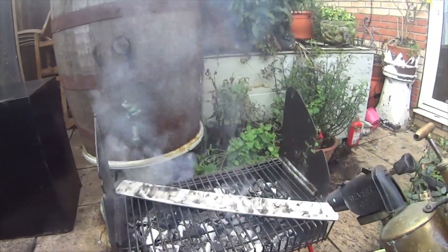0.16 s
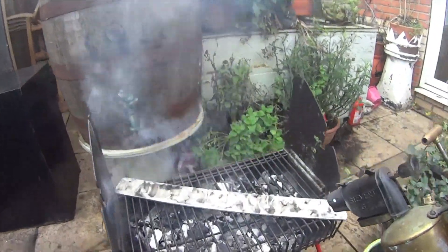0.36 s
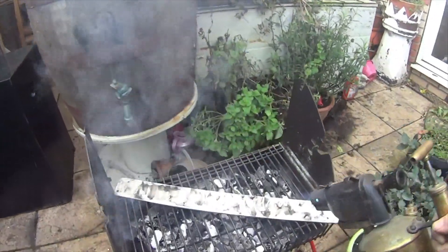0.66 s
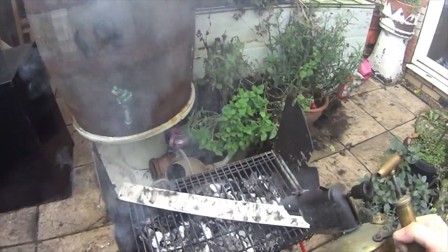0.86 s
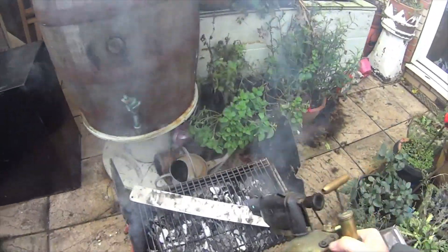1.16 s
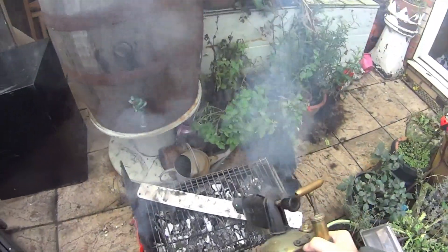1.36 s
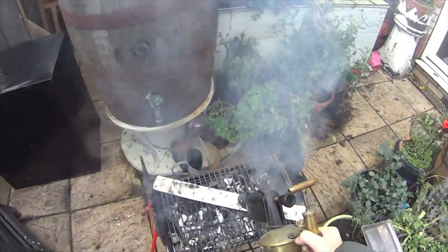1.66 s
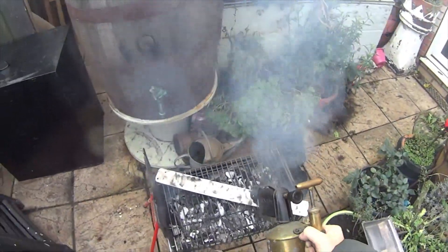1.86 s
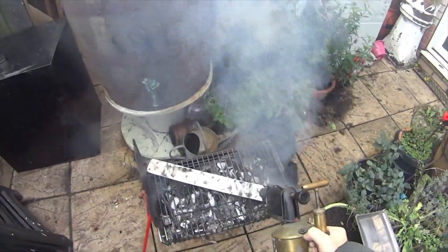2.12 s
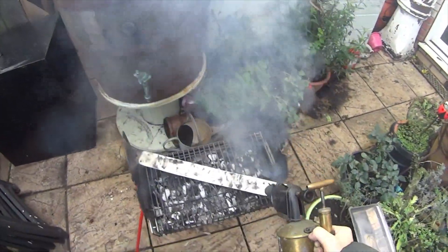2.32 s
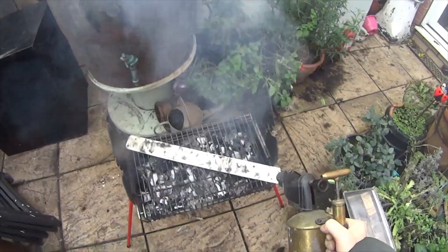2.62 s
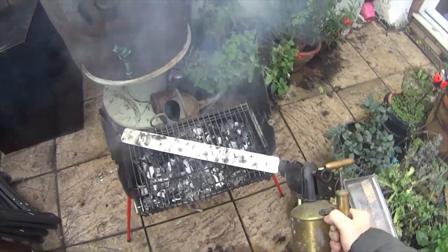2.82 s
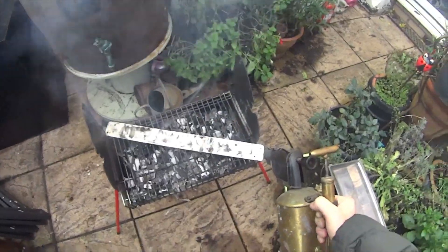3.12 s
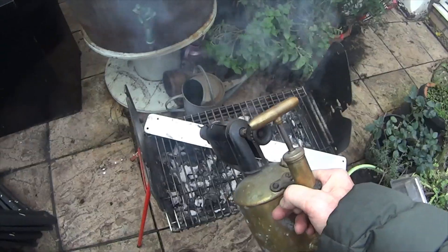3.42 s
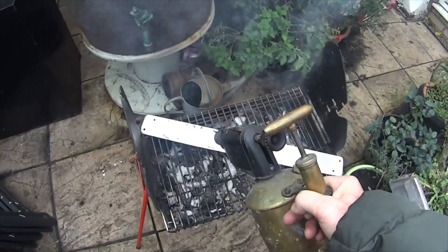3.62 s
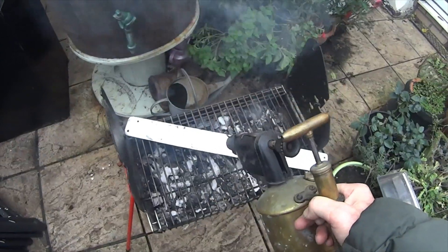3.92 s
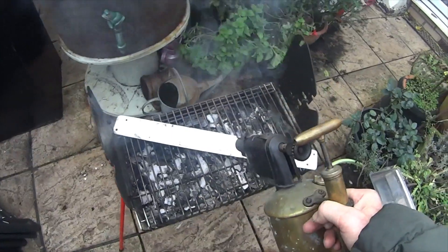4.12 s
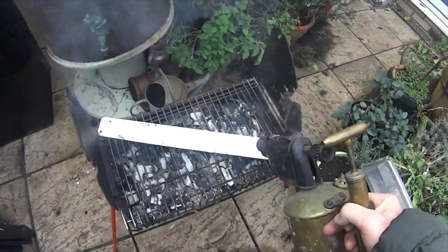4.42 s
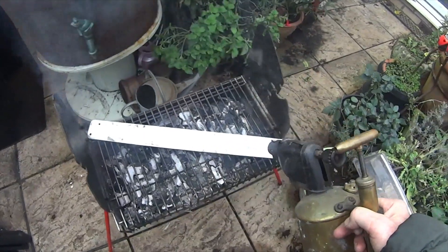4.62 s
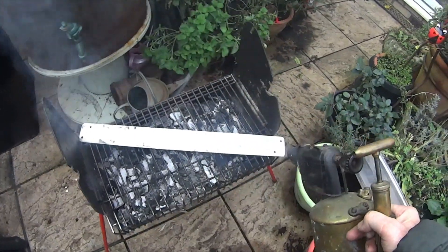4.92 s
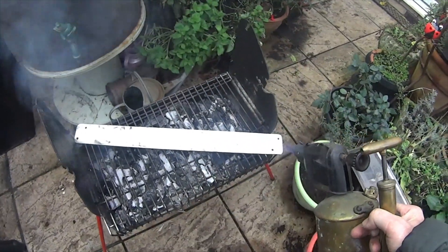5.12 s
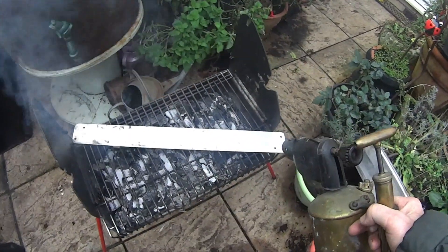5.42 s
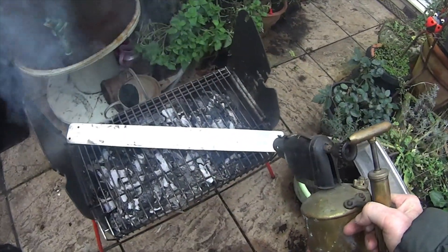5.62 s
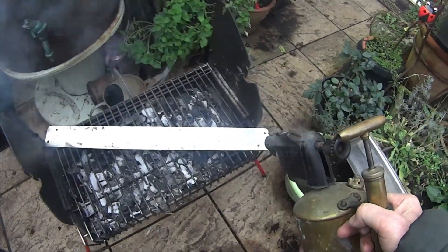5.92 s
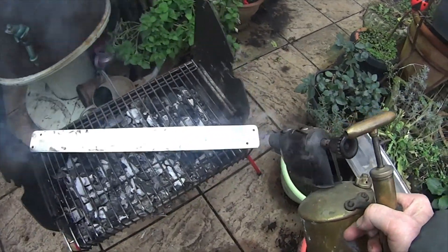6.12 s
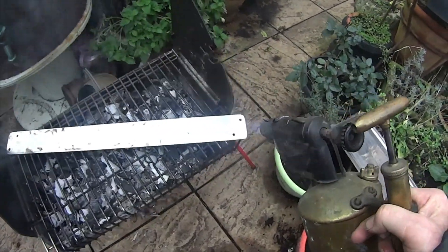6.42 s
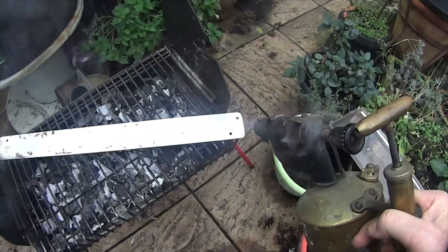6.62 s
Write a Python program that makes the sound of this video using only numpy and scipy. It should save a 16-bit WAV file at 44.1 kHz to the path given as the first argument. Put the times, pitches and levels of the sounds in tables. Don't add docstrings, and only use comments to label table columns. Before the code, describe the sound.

From 0 s a petrol blowtorch burns at full blast close to a handheld stereo microphone in a paved yard. A hoarse, noisy howl around 2 to 2.7 kHz dominates, with breathy flame near 1.2 kHz, bright nozzle hiss from 3.5 to 10 kHz and a soft low roar. It leans left at first, flickering slightly and shifting in colour as the torch moves. Around 2.0 s a warming metal strip gives two small dull ticks. The blast eases a little; a light knock comes at 2.45 s. At 2.75 s a finger thumps the body and smothers the sound until about 2.93 s, with growing skin rub, heavy knocks and nail clicks until 2.97 s. The blast reopens, fades at 3.2 s to roughly a tenth of a second of silence, then returns at 3.34 s. This second shot starts weaker, swells by 4.3 s and holds steady, more central, until cut off near 7 s.

```python
import sys
import numpy as np
from scipy import signal
from scipy.fft import rfft, irfft
from scipy.io import wavfile
from scipy.ndimage import uniform_filter1d, map_coordinates

SR = 44100
rng = np.random.default_rng(int(sys.argv[2]) if len(sys.argv) > 2 else 0)


def invert_db(x):
    u = np.asarray(x, float) / 20
    return 10 ** u


def unload_wav(signal):
    wavfile.write(
        sys.argv[1],
        SR,
        np.round(np.clip(np.atleast_2d(signal).T, -1, 1) * 32767).astype(np.int16),
    )


N = 298116
SCENE_CHANGE_S = 3.28

# time in seconds, howl level in dB, strongest howl pitch in Hz,
# left minus right in dB, nozzle turn towards the camera in dB.
TORCH_MOVES = [
    [(0.0, -17, 2420, -3.5, -1.5), (0.11, -17.5, 2150, -4, 1.5), (1.18, -17.5, 2270, -1, 0),
     (1.4, -18, 2520, 0.0, 1), (2.24, -21.5, 2140, -2.5, 1), (2.46, -19.5, 2200, -4.0, -2.5),
     (2.74, -19.5, 2560, 0.5, 1)],
    [(3.02, -22, 2050, -4, 2), (3.138, -20.5, 2720, 3.5, -0.5), (3.19, -23.5, 2700, 4, 0.5)],
    [(3.39, -22, 2460, 2.0, -1), (3.59, -21.5, 2510, 1.5, -0.5), (3.81, -19.5, 2180, 1, -1),
     (4.28, -17.5, 2400, 1.0, -1.5), (5.6, -17.5, 2420, -1, -1.5), (5.98, -17.5, 2680, 0, 0.5),
     (6.09, -18, 2200, -0.5, -0.5), (6.76, -17.5, 2180, 0.0, 1.5)],
]
# frequency in Hz, density in dB per Hz.
HOWL_SPECTRA = [
    [(1060, -54.5), (1800, -10.5), (1990, -3.5), (2300, -5), (3220, -9), (3600, -20.5), (4680, -63),
     (7920, -120)],
    [(1060, -36.5), (1800, -11), (2050, -2), (2350, -4), (2930, -5), (3180, -6.5), (3350, -10.5),
     (3600, -13), (4680, -49), (7920, -120)],
]
FLAME_SPECTRA = [
    [(400, -49), (680, -22), (774, -12), (1120, -6.5), (1290, -2), (1700, -8), (1850, -11.5), (2400, -41),
     (4070, -120)],
    [(400, -48), (680, -21.5), (791, -9.5), (1000, -8.5), (1130, -2), (1720, -4.5), (1850, -10.5),
     (2400, -39), (4070, -120)],
]
HISS_SPECTRA = [
    [(2060, -45), (3500, -0.5), (3930, -3), (4390, -8.5), (4720, -3.5), (5050, -2.5), (5900, -13),
     (6780, -7.5), (7220, -12.5), (8640, -13), (9330, -19), (10300, -14.5), (11100, -23), (14400, -66.5),
     (22000, -120)],
    [(2060, -41), (3500, -5.5), (4080, -11), (5330, -7.5), (5950, -20), (6280, -19), (6620, -9),
     (6880, -8.5), (7430, -17), (8190, -15), (9150, -23.5), (10400, -18), (11100, -27.5), (14400, -55.5),
     (22000, -120)],
]
ROAR_SPECTRA = [
    [(82, -47), (140, -9), (188, -7), (216, -3), (355, -1.5), (419, 0), (574, -12), (720, -28), (940, -40),
     (1580, -120)],
    [(82, -40), (140, -9.5), (268, 3.5), (302, -2), (394, -4.5), (434, -0.5), (645, -12.5), (720, -4),
     (940, -30), (1580, -120)],
]
# frequency in Hz, left minus right in dB.
PORT_LEAN_DB = [
    [(60, 4.5), (90, 0.5), (130, -4), (200, 2), (300, 0.5), (450, -4), (680, 1.5), (1020, 1.5), (1530, -5),
     (2290, -13), (3440, 0.5), (5150, -1), (7720, -2.5), (11600, -2.5)],
    [(60, 15), (90, 6), (130, -4), (200, 1), (300, -0.5), (450, -1), (680, 2), (1020, 1), (1530, -3.5),
     (2290, -4), (3440, -2), (5150, 1.5), (7720, -3), (11600, -2.5)],
]
# frequency in Hz, left-right likeness from 0 to 1.
PORT_LIKENESS = [(40, .85), (130, .5), (270, 0.9), (550, 0.4), (900, 0.79), (1500, 0.9), (2300, 0.87),
                 (3400, 0.97), (4000, 0.78), (4750, 0.75), (5600, 0.96), (7800, 0.38), (9260, 0.8),
                 (10900, 0.4)]
# frequency in Hz, lead of the left port in radians.
PORT_LEAD_RAD = [(40, -.2), (300, -1.05), (450, -1.3), (600, -3.2), (740, -1.2), (870, -.65), (1600, -.8),
                 (2020, -.2), (3400, -.45), (4700, -.25), (6600, -.7), (7840, -1.2), (8900, -.1),
                 (11000, -.05)]
# centre in seconds, length in seconds, frequency in Hz, gain in dB.
GRILL_ECHOES = [(.55, 0.24, 4470, 9), (.5, 0.32, 382, 4), (2.2, 1, 6800, 4.5), (2.752, .05, 2830, 7),
                (3.173, 0.069, 2870, 10.5), (3.6, 0.069, 2620, 7), (4.2, 0.24, 2360, 5),
                (5.55, .45, 3090, 6), (6.5, 1, 1374, 7.5)]
# time in seconds, frequency in Hz, depth in dB.
PAVING_NOTCH = [(.1, 810, -7), (.5, 836, -18), (.75, 1000, -1.5), (1.1, 1150, -9), (1.7, 1245, -9),
                (2.2, 1460, -6), (2.5, 1475, -0.5), (3.45, 1490, -12), (3.9, 1690, -8)]
# time in seconds, open path in dB.
PORT_COVER = [
    (2.755, 0),
    (2.78, -5.5),
    (2.79, -21),
    (2.9, -21),
    (2.94, -4.5),
    (2.965, -9.5),
    (2.99, -0.5),
    (3.03, 1.11),
]
# time in seconds, peak in dB, direction as a sign.
KNOCKS = [(2.4479, -14, 1), (2.7542, -13.5, -1), (2.775, -17, 1), (2.9087, -5, 1), (2.9335, -7, -1),
          (2.9436, -6.5, -1)]
# time in seconds, peak in dB, half-width in ms.
SQUEEZES = [(2.735, -32, 1.7), (2.805, -23, 4.5), (2.826, -28, 4.3), (2.887, -22.5, 2), (2.965, -20, 3.5),
            (3.175, -31.5, 8.3)]
# time in seconds, peak in dB, centre in
# Hz, length in ms.
NAIL_CLICKS = [(2.7505, -14, 5000, 3), (2.7838, -9.5, 4300, 2.2), (2.918, -12, 2900, 18),
               (2.9418, -5, 2100, 3), (2.9555, -13, 4300, 4.5), (2.959, -7, 1600, 2.5)]
# time in seconds, rumble level in dB.
HAND_SHIFTS = [(1.66, -44), (1.952, -51), (2.02, -52), (2.11, -50), (2.18, -44), (2.25, -48), (2.33, -41),
               (2.452, -33.5), (2.55, -45), (2.67, -40), (2.745, -24), (2.81, -37), (2.9, -28), (2.96, -22),
               (3.085, -47), (3.175, -59)]
# frequency in Hz, density in dB per Hz.
RUMBLE_SPECTRUM = [(12, -36), (25, -4), (50, -4.5), (100, -6.5), (160, -13), (300, -18), (600, -120)]
# frequency in Hz, density in dB per Hz.
SKIN_SPECTRUM = [(150, -25), (250, -10), (850, -13.5), (1200, -4), (1480, -10), (1730, -1.5), (2100, -12),
                 (2700, -11), (3500, -2.5), (4200, -15), (7500, -17), (11100, -34.5), (14400, -69),
                 (22000, -120)]
# time in seconds, level in dB, frequency in Hz, 60 dB decay in seconds.
STRIP_TICKS = [
    (2.018, -21, 1370, .08),
    (2.045, -12, 1375, .06),
]


def unit(x):
    return x / np.sqrt(np.mean(x ** 2) + 1e-20)


def along(points, hz):
    point_hz, value = np.transpose(points)
    return np.interp(np.log(hz + 1), np.log(point_hz + 1), value)


def curves(rows):
    s, *columns = np.transpose(rows)
    return [np.interp(np.arange(N) / SR, s, column) for column in columns]


def wobble(rate_hz):
    knots = rng.standard_normal(int(N * rate_hz / SR) + 4)
    return map_coordinates(knots, [np.arange(N) * rate_hz / SR])


def bump(x, centre, width):
    return np.exp(-((x - centre) / width) ** 2)


def torch():
    howl_db, _, pan_db, turn_db = curves(sum(TORCH_MOVES, []))
    swing_db = howl_db - howl_db.mean()
    second = np.arange(N) > SCENE_CHANGE_S * SR

    def follow(level_db, swing_share, turn_share, second_shot_db):
        return level_db + swing_share * swing_db + turn_share * turn_db + second_shot_db * second

    flame_db = follow(-30, 0.88, 1.1, 0.2)
    hiss_db = follow(-34.5, 0.59, 0.6, 0.35)
    roar_db = follow(-43, 0.7, 0.3, -3)
    hiss_db = hiss_db - 0.22 * curves(PORT_COVER)[0]
    flicker_db = 0.5 * wobble(14) + 0.22 * wobble(30)
    howl = layer(howl_db + flicker_db, HOWL_SPECTRA, 2 * [[(2400, 0.01)]],
                 patchy_db=-0.06, fringe_db=3.5, ridge_db=3.0)
    flame = layer(flame_db + flicker_db, FLAME_SPECTRA, PORT_LEAN_DB, patchy_db=-0.65, fringe_db=3.0)
    hiss = layer(hiss_db + 1.84 * flicker_db + 0.97 * wobble(150), HISS_SPECTRA, PORT_LEAN_DB,
                 patchy_db=0.94, fringe_db=3.5)
    roar = layer(roar_db + 0.69 * flicker_db + 0.69 * wobble(7.8), ROAR_SPECTRA, PORT_LEAN_DB,
                 patchy_db=0.1, fringe_db=3.0)
    return howl * invert_db([pan_db / 2, -pan_db / 2]) + flame + hiss + roar


def layer(level_db, spectra, leans_db, patchy_db, fringe_db, ridge_db=0):
    pair = turbulence(patchy_db, fringe_db, ridge_db)
    first, second = (at_ports(pair, *shot) for shot in zip(spectra, leans_db))
    both = np.where(np.arange(N) < SCENE_CHANGE_S * SR, first, second)
    slow_power = uniform_filter1d(both.mean(0) ** 2, size=SR // 5)
    slow_power = uniform_filter1d(slow_power, size=SR // 5)
    return invert_db(level_db) * both / np.sqrt(abs(slow_power) + 1e-9)


def turbulence(patchy_db, fringe_db, ridge_db):
    hz, t, z = signal.stft(rng.standard_normal((2, N)), SR, nperseg=2048, noverlap=1536)
    patches = smooth_field(z.shape[1:], rows=20, cols=4)
    passing = smooth_field(z.shape[1:], rows=2, cols=15)
    gain_db = patchy_db * patches + fringe_db * passing
    for s, length_s, centre_hz, db in GRILL_ECHOES:
        gain_db = gain_db + db * np.outer(bump(hz, centre_hz, 0.052 * centre_hz), bump(t, s, length_s))
    s, notch_hz, depth_db = np.transpose(PAVING_NOTCH)
    notch = bump(hz[:, None], np.interp(t, s, notch_hz), 70.4)
    gain_db = gain_db + np.interp(t, s, depth_db, right=0) * notch
    s, _, ridge_hz, *_ = np.transpose(sum(TORCH_MOVES, []))
    gain_db = gain_db + ridge_db * bump(hz[:, None], np.interp(t, s, ridge_hz), 270)
    return signal.istft(z * invert_db(gain_db), SR, nperseg=2048, noverlap=1536)[1][:, :N]


def smooth_field(shape, rows, cols):
    field = rng.standard_normal(shape)
    for _ in range(2):
        field = uniform_filter1d(field, rows, 0)
        field = uniform_filter1d(field, cols, 1)
    return unit(field)


def at_ports(pair, spectrum, lean_db):
    hz = np.fft.rfftfreq(N, 1 / SR)
    alike = np.clip(along(PORT_LIKENESS, hz), 0, 1)
    lead_rad = along(PORT_LEAD_RAD, hz)
    lean = invert_db(along(lean_db, hz) / 2)
    shared, own = rfft(pair) * np.sqrt([1 + alike, 1 - alike])
    mean_power = lean ** 2 + lean ** -2 + 2 * alike * np.cos(lead_rad)
    gain = invert_db(along(spectrum, hz)) / np.sqrt(mean_power)
    port = lean * np.exp(0.5j * lead_rad)
    out = irfft(gain * np.array([(shared + own) * port, (shared - own) / port]), N)
    return out / np.std(out.mean(0))


def finger():
    pushes, clicks = np.zeros((2, N)), np.zeros((2, N + SR))
    t = np.arange(SR // 10) / SR
    port_delay_s = np.array([[-0.00015], [0.00015]])
    for s, db, half_width_ms, direction in thumps():
        start = round(s * SR) - len(t) // 2
        late = (t - t.mean() + port_delay_s) / (half_width_ms / 1000)
        pushes[:, start:start + len(t)] += np.sign(direction) * invert_db(db) * np.exp(-late ** 2)
    for s, db, hz, length_ms in NAIL_CLICKS:
        top_ratio = 1.35 if length_ms > 10 else 1.9
        band = signal.butter(3, [hz / 1.7, hz * top_ratio], "bandpass", fs=SR)
        noise = rng.standard_normal(len(t)) + 0.5 * rng.standard_normal((2, len(t)))
        u = t / (length_ms / 1000)
        puff = signal.lfilter(*band, noise) * u * np.exp(-3 * u ** 2)
        clicks[:, round(s * SR):][:, :len(t)] += invert_db(db) * puff / abs(puff).max()
    leak = signal.butter(1, 20, "highpass", fs=SR)
    return signal.lfilter(*leak, pushes) + clicks[:, :N]


def thumps():
    knocks = [(s, db, 0.29, way) for s, db, way in KNOCKS]
    rebounds = [(s + 0.002, db - 12, 2.4, -way) for s, db, way in KNOCKS]
    return knocks + rebounds + [(s, db, ms, 1) for s, db, ms in SQUEEZES]


def hand():
    t = np.arange(N) / SR
    rise_s, t60_s = 0.015, 0.16
    grip = invert_db(np.where(t < SCENE_CHANGE_S, -57, -65))
    for s, db in HAND_SHIFTS:
        rise = np.exp(-(np.minimum(t - s, 0) / rise_s) ** 2)
        grip = grip + invert_db(db - 60 * np.maximum(t - s, 0) / t60_s) * rise
    rub_s, rub_end_s, growth_db_per_s = 2.776, 2.935, 25
    slide = np.clip((t - rub_s) / 0.015, 0, 1) * np.clip(1 - (t - rub_end_s) / 0.012, 0, 1)
    rub = invert_db(-29 + growth_db_per_s * (t - rub_s)) * slide
    for slip_s, db in ((2.89, -25), (2.929, -27)):
        rub = rub + invert_db(db) * bump(t, slip_s, 0.007)
    rumble = grip * unit(invert_db(2.5 * wobble(30)) * coloured(RUMBLE_SPECTRUM, alike=0.75))
    return rumble + rub * unit(invert_db(1.3 * wobble(220)) * coloured(SKIN_SPECTRUM, alike=0.46))


def coloured(spectrum, alike):
    gain = invert_db(along(spectrum, np.fft.rfftfreq(N, 1 / SR)))
    a, b = irfft(rfft(rng.standard_normal((2, N))) * gain, N)
    shared, own = np.sqrt(np.clip([1 + alike, 1 - alike], 0, 2))
    return unit(np.array([shared * a + own * b, shared * a - own * b]))


def strip():
    out, t = np.zeros(N + SR), np.arange(SR // 5) / SR
    for s, db, hz, t60_s in STRIP_TICKS:
        envelope = invert_db(db - 60 * t / t60_s) * (1 - np.exp(-t / 0.0016))
        out[round(s * SR):][:len(t)] += envelope * np.sin(2 * np.pi * hz * t)
    return out[:N] * invert_db([[-2.5], [2.5]])


def scene():
    return torch() * invert_db(curves(PORT_COVER)[0]) + hand() + finger() + strip()


def low_pass(x):
    return signal.sosfilt(signal.butter(12, 12170, fs=SR, output="sos"), x)


def record(dry):
    t = np.arange(N) / SR
    fade_out = np.cos(np.pi / 2 * np.clip((t - 3.197) / 0.02, 0, 1)) ** 2
    fade_in = np.sin(np.pi / 2 * np.clip((t - 3.337) / 0.034, 0, 1)) ** 2
    held = dry / (1 + abs(dry / 0.7) ** 6) ** (1 / 6)
    top_hz = 11150
    limited = irfft(rfft(held) * (np.fft.rfftfreq(N, 1 / SR) < top_hz), N)
    return low_pass(limited * (fade_out + fade_in))


dry = scene()
out = record(dry)
unload_wav(out)
```